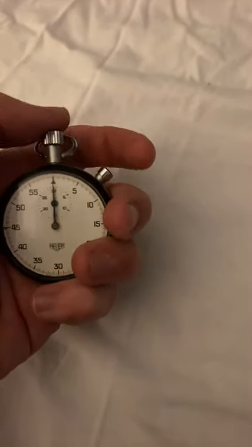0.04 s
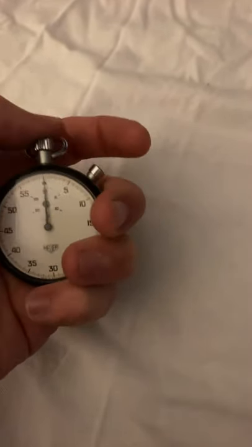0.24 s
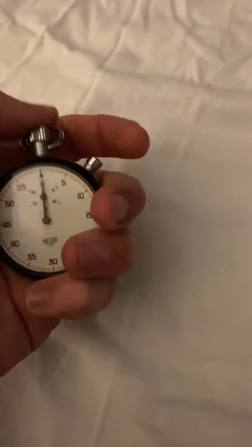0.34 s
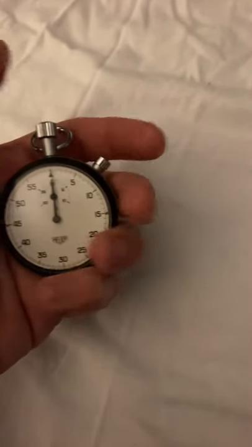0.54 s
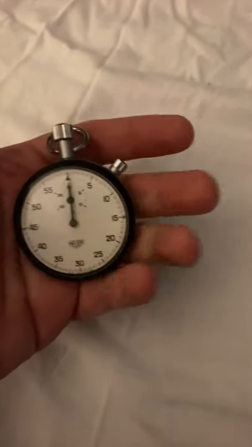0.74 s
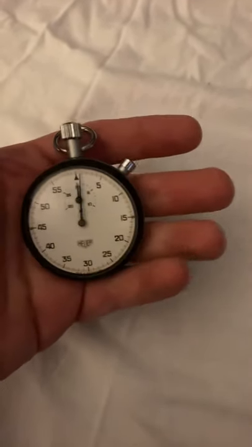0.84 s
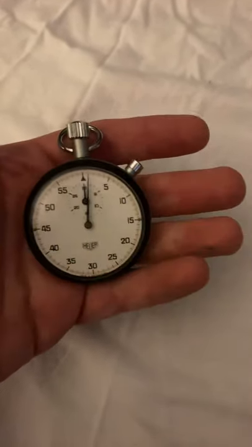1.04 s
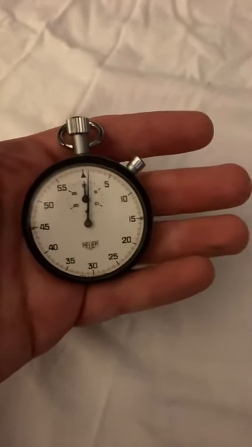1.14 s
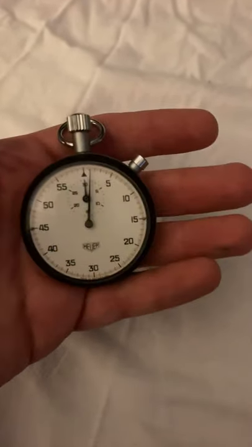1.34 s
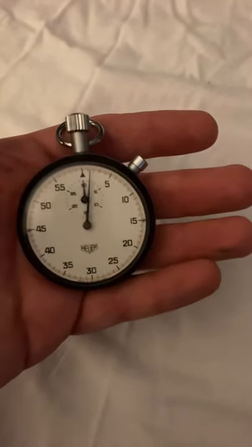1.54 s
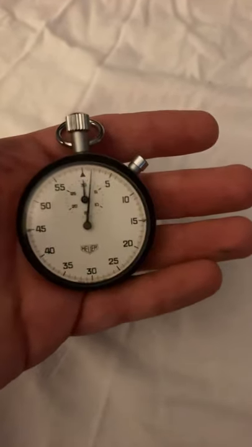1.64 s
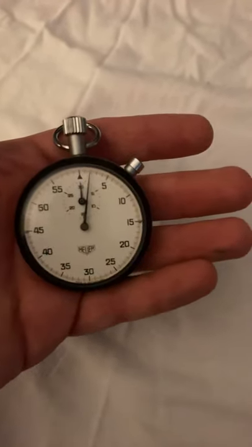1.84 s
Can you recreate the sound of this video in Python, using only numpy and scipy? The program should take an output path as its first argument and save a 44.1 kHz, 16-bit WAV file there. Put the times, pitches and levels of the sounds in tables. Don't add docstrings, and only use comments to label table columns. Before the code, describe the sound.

A mechanical stopwatch held close to a phone microphone: faint slack tick at 0.14 s, short gritty slide, then a sharp, bright steel click at 0.21 s with a dull palm knock and short room reflections. A softer ringing release snap comes at 0.42 s. Very faint alternating ticks and tocks continue about every 0.2 s, with tiny skin and sheet rustles from 0.85 to 1.6 s over quiet hum, hiss and a thin whine fading near 1.3 s.

```python
import sys
import numpy as np
from scipy import signal
from scipy.io import wavfile

SR = 44100
rng = np.random.default_rng(int(sys.argv[2]) if len(sys.argv) > 2 else 0)


def level_to_linear(level):
    exponent = np.asarray(level, float) / 20
    return 10 ** exponent


def transcribe(signal):
    frames = np.atleast_2d(signal).T
    limited = np.clip(frames, -1, 1)
    pcm = np.round(limited * 32767).astype(np.int16)
    wavfile.write(sys.argv[1], SR, pcm)


N = 83790
CONTACT_S = .0005


def rms_one(x):
    return x / np.sqrt(np.mean(x ** 2) + 1e-20)


def band(x, low_hz, high_hz):
    edges = [low_hz, min(high_hz, .45 * SR)]
    return signal.sosfilt(signal.butter(2, edges, "band", fs=SR, output="sos"), x)


def high(x, hz):
    return signal.sosfilt(signal.butter(4, hz, "high", fs=SR, output="sos"), x)


def place(s, x):
    out, i = np.zeros(N + len(x)), int(s * SR)
    out[i:i + len(x)] = x
    return out[:N]


def ring(clicks, hz, t60):
    r, w = level_to_linear(-60 / (t60 * SR)), 2 * np.pi * hz / SR
    return signal.lfilter([0, np.sin(w)], [1, -2 * r * np.cos(w), r * r], clicks + 1e-18)


def drift(rate):
    r = np.exp(-80 * np.pi * rate / SR)
    slow = signal.lfilter([1], [1, -2 * r, r * r], rng.standard_normal(N // 40 + 2002))[2000:]
    return np.interp(np.arange(N) / 40, np.arange(len(slow)), rms_one(slow))


def strike(s, db, modes):
    t = np.arange(SR // 4) / SR
    rings = sum(level_to_linear(db + m_db - 60 * t / t60) * np.sin(2 * np.pi * hz * t) for hz, m_db, t60 in modes)
    return place(s, rings * (1 - np.exp(-t / CONTACT_S)))


# (time [s], level [dB])
SLACK = (.1418, -56)
# (frequency [Hz], level [dB], t60 [s])
SLACK_MODE = (3000, 3, 0.011)
# (start [s], end [s], level [dB])
SLIDES = [
    (.2035, .2143, -52),
    (.417, .4243, -63),
]
# (time [s], level [dB], crack level [dB], room level [dB])
SNAPS = [
    (.2146, -19.5, -1, -.3),
    (.4243, -32.5, -6, -9),
]
# (frequency [Hz], level [dB], t60 [s])
CASE = [(2917, -12, 0.046), (3010, -2.5, 0.013), (3128, 4.5, 0.015), (3450, -21, 0.13), (4390, -12, 0.019),
        (4830, -5.5, 0.013), (5110, -10, 0.02), (5230, 3.5, 0.0091), (6140, -8, 0.017), (7420, -13, 0.0072),
        (8590, -8, 0.0053), (10000, 0, 0.0072), (11900, -13, 0.0049), (13530, -11, 0.013)]
# (frequency [Hz], level [dB], t60 [s])
FREE_CASE = [(2710, -7.5, 0.056), (2990, -9.5, 0.17), (3118, -1, 0.075), (3210, -0.5, 0.085),
             (3570, -36, 0.28), (4240, -19, 0.031), (6000, -14, 0.028), (6470, -16, 0.033),
             (7170, -41, 0.013), (8730, -14.5, 0.011), (10000, -10, 0.0087), (10520, 0.5, 0.0076),
             (11700, -18, 0.0062), (13300, -13, 0.011)]


def crown():
    slide_per_s, shell_top_hz, radiates_hz = 9000, 4000, 2120
    crack_db, crack_t60_s, crack_lead_s = 1.5, .007, .0002
    rattle_db, rattle_t60_s = -20, .05
    room_parts_db, room_crack_db = -5, 13
    t, short = np.arange(N) / SR, np.arange(SR // 10) / SR
    out, feed = strike(*SLACK, [SLACK_MODE]), np.zeros(N)
    shape = level_to_linear(-60 * short / crack_t60_s) + level_to_linear(rattle_db - 60 * short / rattle_t60_s)
    shape = shape * (1 - np.exp(-short / CONTACT_S))
    tap = band(1. * (short == 0), 4710, 11200)
    for (s, db, snap_db, room_db), modes in zip(SNAPS, (CASE, FREE_CASE)):
        noise = band(shape * rng.standard_normal(len(short)), 4600, 14100)
        crack = level_to_linear(db + crack_db + snap_db) * place(s - crack_lead_s, noise)
        shell = strike(s, db, [m for m in modes if m[0] < shell_top_hz])
        parts = strike(s, db, [m for m in modes if m[0] >= shell_top_hz])
        out += shell + parts + crack
        feed += level_to_linear(room_db) * shell + level_to_linear(room_parts_db) * parts
        feed += level_to_linear(db + snap_db + room_crack_db) * place(s, tap)
    grit = (rng.random(N) < slide_per_s / SR) * rng.standard_normal(N)
    grit = sum(ring(grit, hz, .006) for hz, _, _ in CASE[1:9])
    grit = rms_one(band(grit, 2600, 8200))
    for a, b, db in SLIDES:
        out += level_to_linear(db) * grit * np.interp(t, [a, a + 0.0011, b, b + 0.00043], [0.015, 1.0, 1, 0.038])
    return high(np.array([out, feed]), radiates_hz)


# (frequency [Hz], level [dB], t60 [s])
KNOCK = [(495, -26, .005), (700, -19, 0.0064), (950, -16, 0.0037), (1346, -8, 0.0057), (1760, -15, 0.007)]


def knock():
    return sum(strike(s + .001, db, KNOCK) for s, db, _, _ in SNAPS)


# (time [s], level [dB], lever level [dB])
TICKS = [
    (0.266, -83, -76),
    (0.664, -70, -77),
    (1.061, -69, -70.5),
    (1.460, -70.5, -69),
    (1.86, -69.5, -69.5),
]
# (time [s], level [dB])
TOCKS = [(0.518, -76.5), (0.917, -79), (1.320, -77.5), (1.72, -76.5)]
# (frequency [Hz], level [dB], t60 [s])
TICK_MODES = [(2790, -2.5, .2), (3210, -6, .05), (3440, -4, .15), (3690, -3, .15)]
TOCK_MODES = [(2950, -4, .12), (3190, 0, .05), (3300, -3, .03), (3640, -7, .1)]
DROP_MODES = [(6500, 4.5, 0.11), (10500, 10, 0.014), (12700, -4, 0.028)]
# (delay [s], start [Hz], end [Hz], glide [s], level [dB], t60 [s])
TICK_SPRING = (.022, 3250, 3070, .05, -1, .6)
TOCK_SPRING = (.001, 3140, 3195, .008, 3.5, .5)
# (frequency [Hz], level [dB], hold [s], stop t60 [s])
LEVER = (3004, 3, .04, .04)


def escapement():
    drop_s, drop_db = 0.0083, -5.5
    out = np.zeros(N)
    for s, db, lever_db in TICKS:
        out += strike(s, db, TICK_MODES) + strike(s + drop_s, db + drop_db, DROP_MODES)
        out += spring(s, db, *TICK_SPRING) + lever(s, lever_db, *LEVER)
    for s, db in TOCKS:
        out += strike(s, db, TOCK_MODES) + spring(s, db, *TOCK_SPRING)
    return out


def spring(s, db, delay, start_hz, end_hz, glide, own_db, t60):
    hold_s, stop_t60_s, rise_s = .08, 0.055, 0.0008
    t = np.arange(SR // 4) / SR
    hz = end_hz + (start_hz - end_hz) * np.exp(-t / glide)
    stop_db = 60 * np.clip(t - hold_s, 0, 1) / stop_t60_s
    level = level_to_linear(db + own_db - 60 * t / t60 - stop_db) * (1 - np.exp(-t / rise_s))
    return place(s + delay, level * np.sin(2 * np.pi * np.cumsum(hz) / SR))


def lever(s, db, hz, own_db, hold, t60):
    free_t60_s = 1.2
    t = np.arange(SR // 4) / SR
    stop_db = 60 * np.clip(t - hold, 0, 1) / t60
    return place(s, level_to_linear(db + own_db - 60 * t / free_t60_s - stop_db) * np.sin(2 * np.pi * hz * t))


ECHO_S = [.0092, .0112, .0135, .0177, .0205, .0232, .027, .033]
ECHO_DB = [-11, -16, -20, -17, -19, -18, -23, -26]


def bedroom(x):
    tail_start_s, tail_db, tail_t60_s = .01, -37, 0.24
    bright_db, bright_t60_s = 8.5, 0.18
    smear_db, smear_s = -17, .0016
    t = np.arange(SR // 2) / SR
    white = rng.standard_normal((3, len(t)))
    rise = np.clip((t - tail_start_s) / 0.008, 0, 1) * level_to_linear(tail_db)
    tail = band(white[0], 2780, 3740) * level_to_linear(-60 * t / tail_t60_s)
    tail += band(white[1], 4900, 12300) * level_to_linear(bright_db - 60 * t / bright_t60_s)
    h = rise * tail
    for s, db in zip(ECHO_S, ECHO_DB):
        h[int(s * SR)] += level_to_linear(db)
        h += level_to_linear(db + smear_db) * white[2] * (t > s) * np.exp(-np.clip(t - s, 0, 1) / smear_s)
    return high(signal.fftconvolve(x, h)[:N], 2300)


# (time [s], length [s], level [dB], low edge [Hz], high edge [Hz])
RUSTLES = [(.88, 0.093, -76.5, 10000, 15100), (0.961, 0.044, -66.5, 1090, 2600),
           (1.2, 0.032, -73, 3940, 14800), (1.448, 0.012, -77, 2930, 9000),
           (1.577, 0.027, -72.5, 2980, 11800), (0.85, 0.092, -72, 1990, 7000)]


def rustles():
    t = np.arange(N) / SR
    grain = rng.standard_normal(N) * level_to_linear(1.1 * drift(150))
    return sum(level_to_linear(db) * rms_one(band(grain, low_hz, high_hz)) * np.exp(-((t - s) / (length / 2)) ** 2)
               for s, length, db, low_hz, high_hz in RUSTLES)


# (frequency [Hz], level [dB])
AIR = [(15, -45), (25, -8), (127, -1.5), (405, -10), (714, -12), (1610, -14.5), (2610, -26.5), (5730, -28),
       (16000, -35.5)]
# (frequency [Hz], width [Hz], level [dB])
HUM = [(120, 11, -69.5), (240, 10, -75), (280, 16, -76), (700, 34, -73.5), (1200, 90, -77),
       (1600, 120, -79), (6200, 1800, -81)]


def air():
    air_db, patchy_db = -63.5, 1.5
    whine_hz, whine_width_hz, whine_db = 4730, 570, -76
    whine_rise_s, whine_fade_s, whine_slope_s = 0.073, 1.27, 0.073
    white = rng.standard_normal((3, N + SR))
    edges, table = 25 * 2 ** np.arange(0, 9.6, .5), np.array(AIR)
    hiss = np.zeros(N)
    for k, (a, b) in enumerate(zip(edges, edges[1:])):
        level_db = np.interp(np.log(a * b) / 2, np.log(table[:, 0]), table[:, 1])
        hiss += band(white[k % 2], a, b)[SR:] * level_to_linear(level_db + patchy_db * drift(4.3))
    out = level_to_linear(air_db) * rms_one(hiss)
    for hz, width, db in HUM:
        out += level_to_linear(db) * rms_one(band(white[2], hz - width / 2, hz + width / 2)[SR:])
    t = np.arange(N) / SR
    fade = 1 / (1 + np.exp((t - whine_fade_s) / whine_slope_s))
    fade = fade / (1 + np.exp((whine_rise_s - t) / whine_slope_s))
    whine = band(white[2], whine_hz - whine_width_hz / 2, whine_hz + whine_width_hz / 2)[SR:]
    return out + fade * level_to_linear(whine_db) * rms_one(whine)


def scene():
    beat_room_db = -9
    snaps, feed = crown()
    beats = escapement()
    room = bedroom(feed + level_to_linear(beat_room_db) * beats)
    return (snaps + beats + knock() + room + rustles() + air())[None]


def roll_off(x):
    return signal.sosfilt(signal.butter(12, 16510, fs=SR, output="sos"), x)


def record(dry):
    low_hz, top_hz = 50.3, 16600
    top = signal.cheby2(14, 60, top_hz, fs=SR, output="sos")
    mix = signal.sosfilt(top, high(dry, low_hz))
    return roll_off(mix)


dry = scene()
out = record(dry)
transcribe(out)
```